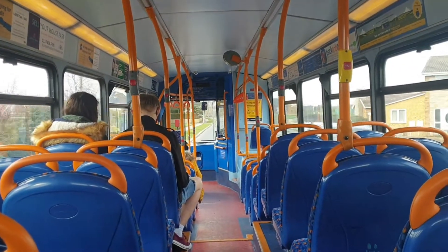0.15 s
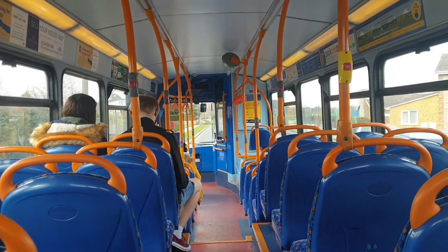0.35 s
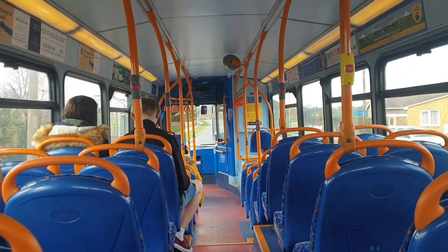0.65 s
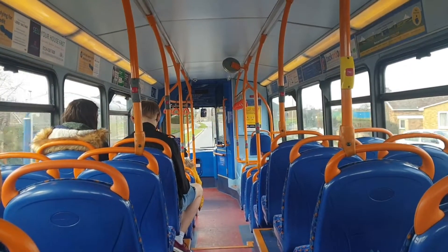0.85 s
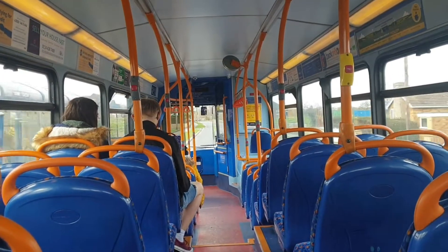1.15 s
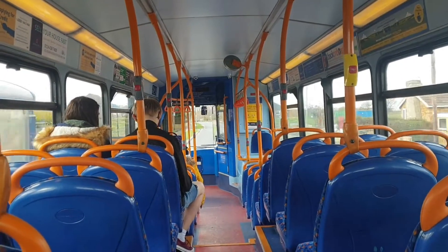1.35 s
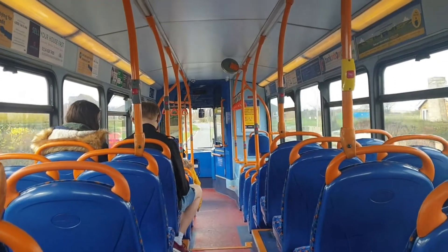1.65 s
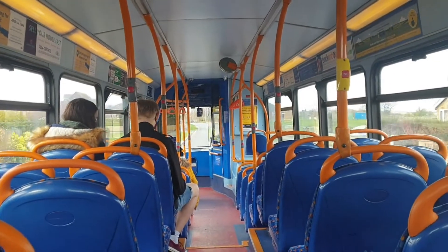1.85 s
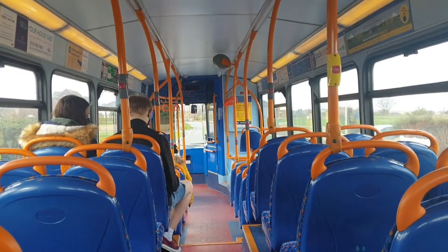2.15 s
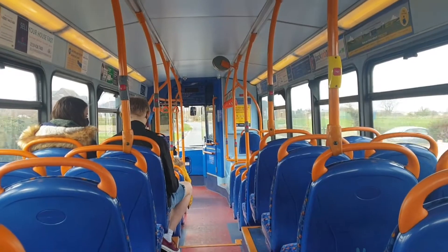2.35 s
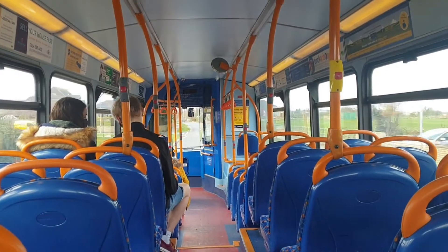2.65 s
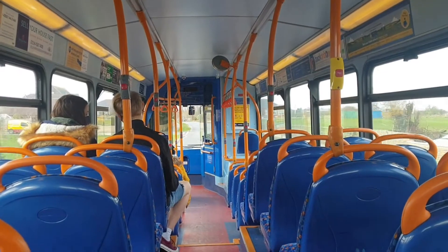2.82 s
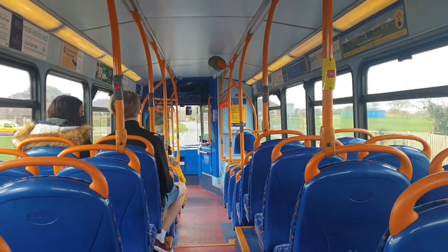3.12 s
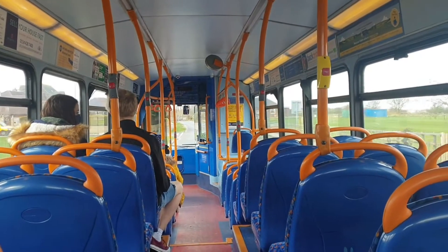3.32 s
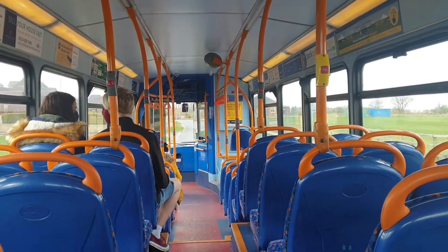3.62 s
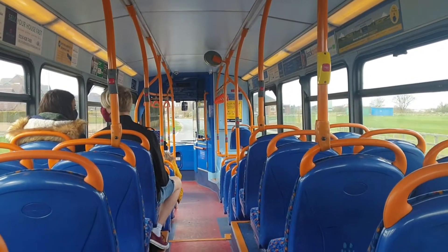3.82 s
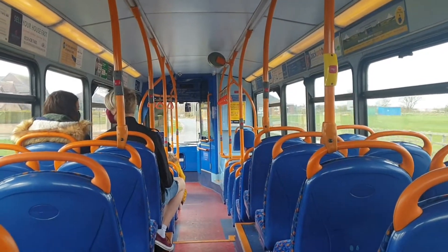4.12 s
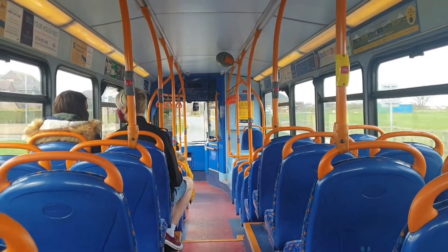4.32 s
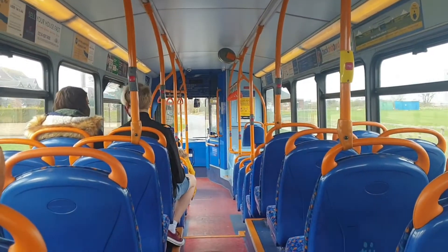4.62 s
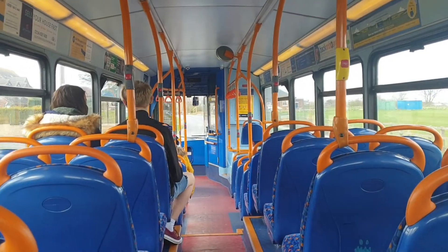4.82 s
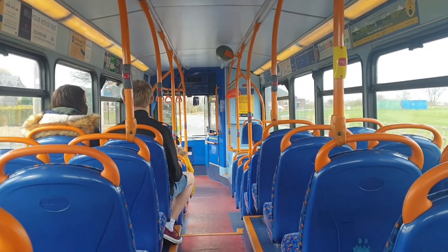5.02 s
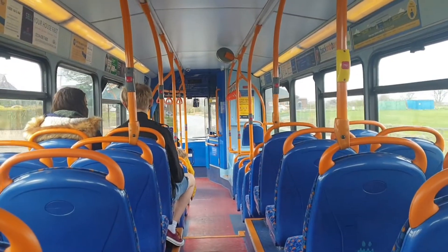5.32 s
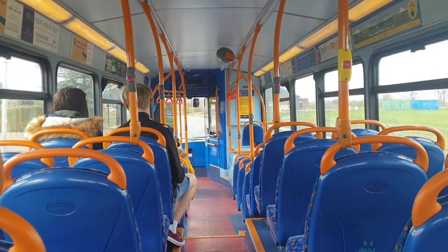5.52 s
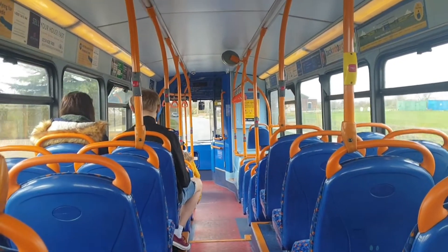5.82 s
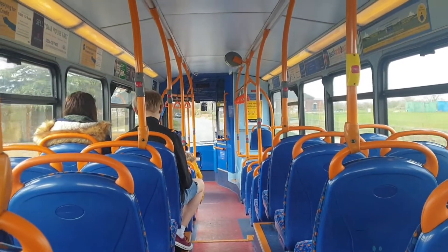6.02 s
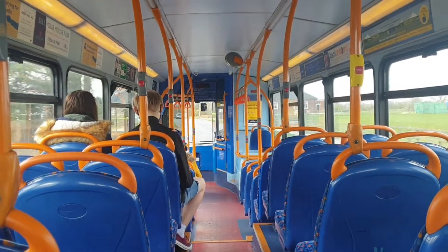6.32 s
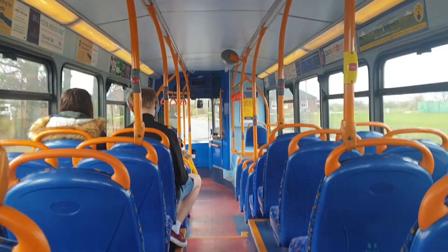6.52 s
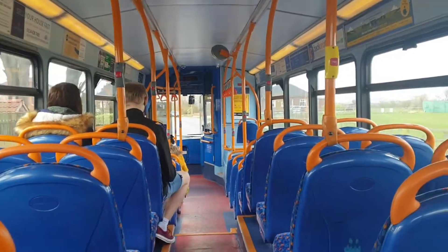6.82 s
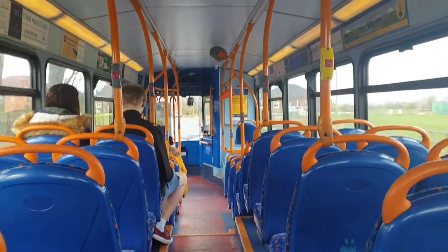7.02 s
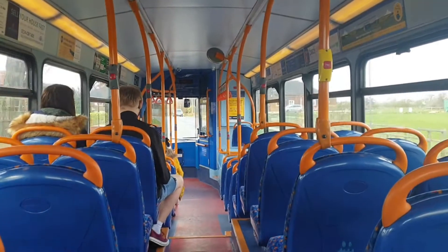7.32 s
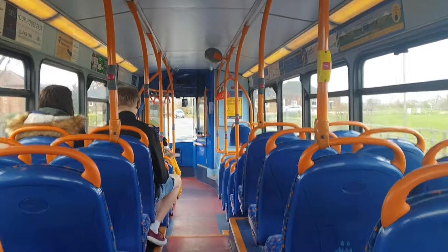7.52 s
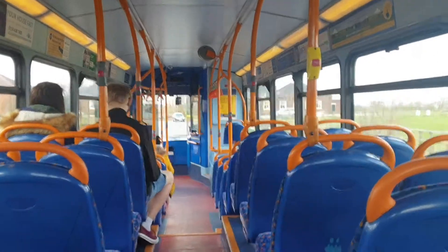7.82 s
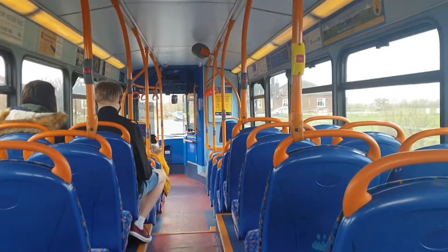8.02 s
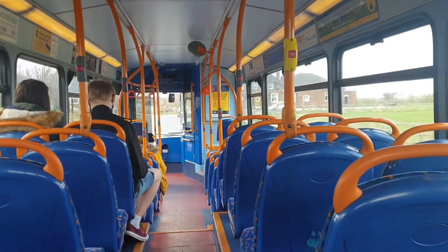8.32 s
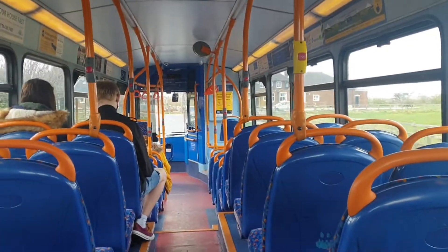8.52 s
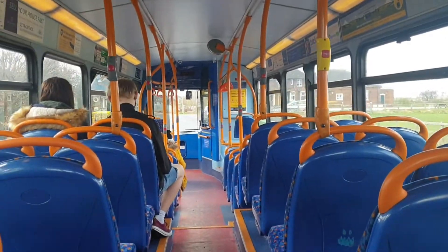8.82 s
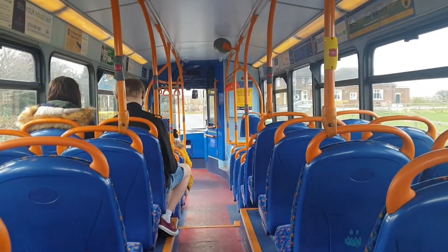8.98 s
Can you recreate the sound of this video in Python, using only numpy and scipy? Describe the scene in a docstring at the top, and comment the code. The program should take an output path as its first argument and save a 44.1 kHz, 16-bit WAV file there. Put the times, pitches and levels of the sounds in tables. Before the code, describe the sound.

Inside a moving diesel bus, the engine drones, drops a gear and pulls harder, changes up, then a loose panel rattles fast over rough road.

```python
"""Rear seats of a moving diesel bus. The six-cylinder engine changes down, pulls and changes up: its
firings are sines booming through saloon resonances, under shaft orders, knocks and bursts of noise.
The axle drone follows road speed, and turbo and fans whistle faintly. Shaped noise makes the road;
on a rough stretch the rumble rises and a loose panel slams about ten times a second, ringing, as
fittings buzz. A few hoots and metal tinkles are heard as well."""
import sys
import numpy as np
from scipy import signal
from scipy.fft import rfft, irfft, next_fast_len
from scipy.io import wavfile

SR = 44100
rng = np.random.default_rng(int(sys.argv[2]) if len(sys.argv) > 2 else 0)


def write(x):
    x = np.atleast_2d(x).T
    wavfile.write(sys.argv[1], SR, np.round(np.clip(x, -1, 1) * 32767).astype(np.int16))


N = 403498
TIME = np.arange(N) / SR
SIZE = next_fast_len(N + SR // 10, True)
FREQS = np.maximum(np.fft.rfftfreq(SIZE, 1 / SR), 1)

# engine speed: time_s, firing_hz
REVS = [(0, 51.82), (1.3, 53.5), (1.58, 73.54), (1.7, 77.74), (2.2, 78.06), (2.8, 81.67), (3.47, 81.6),
        (3.7, 71.75), (3.8, 65.96), (3.95, 59.22), (4.2, 57.97), (6.2, 58.86), (7, 60.1), (9.15, 59.1)]
# gear changes, down then up: start_s, end_s, axle_drone_change_db, engine_boom_change_db, floor_roar_change_db
SHIFTS = [(1.333, 1.688, -9.5, -6, 0.5), (3.648, 3.916, 2, -5.5, 6)]
# panel slams: time_s, level_db (among slams), then relative to it: thud_db, knock_db, sizzle_db, bounces_db
SLAMS = [(5.8592, -36.5, -0.5, -3, -6, 2), (6.46, -35, -17, -12, 8, 0), (6.541, -25, -8, -14, 0, 0),
         (6.597, -23.5, -2.5, -19, -8, -1), (6.6392, -22, 2, 1.5, -7, 3.5),
         (6.7332, -20.5, -3.5, 0, 2.5, -3.5), (6.8333, -20.5, -3, 0.5, 3, 2),
         (6.9195, -26.5, 3, 3, -2, 0.5), (7.0116, -19, -4.5, -4, 2, 4.5),
         (7.111, -20.5, -4.5, -1.5, -1, -5), (7.271, -29.5, -4.5, -12, -2, 0),
         (7.314, -29.5, -4.5, -1.5, 1, 2), (7.393, -32, -30, -20, 0, 8), (7.655, -22, -0.5, 2, 3.5, -2),
         (7.7627, -16.5, -1, -3, 0.5, 0.5), (7.8547, -15.5, -1.5, -3, 0, 3.5),
         (7.9579, -17.5, -4, 0, 2.5, 3.5), (8.0547, -18.5, -2.5, -2, 0.5, -0.5),
         (8.124, -33, -10, -11.5, 2, 0), (8.153, -24, -2, 1.5, 2, -4), (8.2175, -29, -15, -13, 0, 4),
         (8.69, -32.5, 1, 2, -6, 6), (8.781, -28.5, -0.5, 1, 2, 1)]
# panel knock spectrum: freq_hz, relative_db
KNOCK_COLOUR = [(600, -11), (1000, 1.5), (1700, -8), (2100, 8.5), (2500, -0.5), (2850, 2), (3500, -1),
                (4500, -18.5), (7000, -13), (9000, -27.5)]
# panel thud spectrum: freq_hz, relative_db
THUD_COLOUR = [(90, -24), (200, 1.5), (340, 8), (480, -5), (700, 0), (1000, -10.5), (1600, -18),
               (4000, -47.5)]

SHIFT_RAMP_S = .1
ROUGH_START_S, ROUGH_END_S, ROUGH_RAMP_S = 6.1, 8.3, 0.36
MAX_SIDE_LAG_S = 1.3e-4


def undb(db):
    """Decibels to gain."""
    return 10 ** (np.asarray(db) / 20)


def unit(x):
    """Scale to rms 1."""
    return x / np.sqrt(np.mean(x ** 2))


def curves(table):
    """Every column of a table, joined by straight lines in time."""
    time_s, *columns = np.transpose(table)
    return [np.interp(TIME, time_s, column) for column in columns]


def on_freqs(points):
    """Points joined on a log-frequency axis."""
    hz, value = np.transpose(points)
    return np.interp(np.log(FREQS), np.log(hz), value)


def response(hz, points):
    """Level in dB of a tone as it glides through a table of resonances."""
    return np.interp(hz, *np.transpose(points))


def during(start_s, end_s, ramp_s):
    """1 between two moments and 0 outside, with ramps centred on them."""
    return np.clip(.5 + np.minimum(TIME - start_s, end_s - TIME) / ramp_s, 0, 1)


def walk(rate_hz):
    """Smooth random wander with spread near 1, through rate_hz random knots a second."""
    knots = rng.standard_normal(1024)
    place = TIME * rate_hz % 1023
    k = place.astype(int)
    part = place - k
    ease = part * part * (3 - 2 * part)
    return knots[k] + (knots[k + 1] - knots[k]) * ease


def fade(t60_s):
    """Exponential decay that loses 60 dB in t60_s."""
    return np.exp(-np.minimum(np.log(1000) * TIME / t60_s, 50))


def filtered(x, gains):
    """Apply a frequency response."""
    return irfft(rfft(x, SIZE) * gains, SIZE)[..., :N]


def colour(x, points):
    """Causal minimum-phase filter with the given spectrum, built from its cepstrum."""
    cepstrum = irfft(np.log(undb(on_freqs(points))), SIZE)
    cepstrum[1:SIZE // 2] *= 2
    cepstrum[SIZE // 2 + 1:] = 0
    return filtered(x, np.exp(rfft(cepstrum)))


def voiced(x, points):
    """Colour a stereo signal and bring its middle to rms 1."""
    y = colour(x, points)
    return y / np.std(y.mean(axis=0))


def resonance(x, centre_hz, half_width_hz):
    """A sound heard through one two-pole resonance, at rms 1."""
    return unit(filtered(x, 1 / (1 + 1j * (FREQS - centre_hz) / half_width_hz) ** 2))


def turns(hz):
    """Cycles completed at a changing rate."""
    return np.cumsum(hz) / SR


def tone(cycles, db):
    """A sine with the given rms level."""
    return np.sqrt(2) * undb(db) * np.sin(2 * np.pi * cycles)


def spread(cycles, db):
    """A tone reaching the two sides with a random lag: the higher it is, the more their phases differ."""
    lag_samples = rng.uniform(-1, 1) * MAX_SIDE_LAG_S * SR
    return np.array([tone(cycles, db), tone(cycles + lag_samples * np.gradient(cycles), db)])


def diffuse():
    """Noise from all round the saloon: alike on both sides in the bass only."""
    # likeness of left and right: freq_hz, correlation
    likeness = [(60, .96), (130, .92), (290, .8), (640, .48), (1410, .02), (15000, .02)]
    like = np.clip(on_freqs(likeness), 0, 1)
    mid, side = rng.standard_normal((2, N))
    side = filtered(side, np.sqrt((1 - like) / (1 + like)))
    return np.array([mid + side, mid - side])


def scatter(blows, decay):
    """The saloon's dense reflections: fresh noise whose power follows the blows."""
    power = signal.fftconvolve(blows ** 2, decay[:SR // 2] ** 2)[:N]
    return diffuse() * np.sqrt(np.maximum(power, 0) / power.mean())


def lifted():
    """How far the driver's foot is off the pedal, 0-1."""
    # accelerator: time_s, share_of_full_throttle
    throttle = [(5.45, 0.93), (5.65, 0.3), (5.87, 0.46), (6.15, 0.98), (7.3, 0.79), (7.95, 0), (8.35, 0.33),
                (8.95, 0.28)]
    pedal, = curves(throttle)
    return 1 - np.clip(pedal, 0, 1)


def effort():
    """Engine effort in dB over cruising: it follows speed and throttle, late by the turbo's lag."""
    cruise_hz, db_per_octave, lift_db, turbo_lag_s = 58.5, 5.5, -6.5, 0.2
    hz, = curves(REVS)
    demand_db = db_per_octave * np.log2(hz / cruise_hz) + lift_db * lifted()
    keep = np.exp(-1 / (turbo_lag_s * SR))
    return signal.lfilter([1 - keep], [1, -keep], demand_db)


def gearbox():
    """Level changes in dB at the gear changes: axle drone, engine boom and floor roar."""
    return sum(np.outer(db, during(start_s, end_s, SHIFT_RAMP_S)) for start_s, end_s, *db in SHIFTS)


def engaged():
    """How firmly the top gear and the lower gear are engaged, 0-1; both let go during a change."""
    (down_start_s, down_end_s, *_), (up_start_s, up_end_s, *_) = SHIFTS
    top = 1 - during(down_start_s, up_end_s, SHIFT_RAMP_S)
    low = during(down_end_s, up_start_s, SHIFT_RAMP_S)
    return top, low


def road():
    """Bumps boom the body on its springs; driveline roars through the floor, tyres on the rough stretch."""
    # spectra: freq_hz, relative_db
    rumble_colour = [(15, -33.5), (26, 2.5), (42, 12), (52, 10), (68, 10), (85, 6), (105, -4.5), (200, -70)]
    # driveline roar: freq_hz, relative_db
    roar_colour = [(60, -12), (98, -1.5), (125, -1), (148, 7.5), (175, 4), (220, -1.5), (270, -3.5),
                   (350, -8.5), (450, -9), (600, -11.5), (760, -16), (1000, -21), (2000, -29.5),
                   (6000, -55)]
    # tyre roar: freq_hz, relative_db
    tyre_colour = [(60, -8.5), (98, -2), (148, 13.5), (220, 5), (270, 2), (350, -8.5), (450, -7.5),
                   (600, -9.5), (1000, -16), (2000, -21.5), (6000, -53)]
    # bumps: peak_s, body_boom_hz, peak_level_db
    bump_list = [(1.13, 43, -23), (4.47, 44, -32), (6.62, 42, -15.5), (6.84, 48, -16.5), (7.05, 42, -16),
                 (7.27, 49, -16), (7.63, 40, -17), (7.73, 52, -13.5), (7.99, 43, -18.5), (8.28, 138, -26.5),
                 (8.66, 47, -20)]
    rumble_db, rough_rumble_lift_db = -33, 6.5
    driveline_db, throttle_lift_db, tyres_db = -34, -2.5, -29
    bump_rise_s, bump_settle_s, bump_pitch_waver = 0.073, 0.092, .12

    rough = during(ROUGH_START_S, ROUGH_END_S, ROUGH_RAMP_S)
    rumble = voiced(diffuse(), rumble_colour) * undb(rumble_db + rough_rumble_lift_db * rough)
    bumps = 0
    for s, hz, db in bump_list:
        swell = np.exp(-np.maximum((s - TIME) / bump_rise_s, (TIME - s) / bump_settle_s))
        bumps = bumps + swell * tone(turns(hz * (1 + bump_pitch_waver * walk(25))), db)
    _, _, shift_db = gearbox()
    driveline_gain = undb(driveline_db + throttle_lift_db * lifted() + shift_db)
    driveline = voiced(diffuse(), roar_colour) * driveline_gain
    tyres = voiced(diffuse(), tyre_colour) * undb(tyres_db) * rough
    return rumble + bumps + (driveline + tyres) * undb(1.5 * walk(15))


def whistles():
    """The turbo tone spools up and runs down; the fans sing near a steady pitch over resonant air noise."""
    # turbo: time_s, pitch_hz, level_db
    turbo_track = [(1.5, 1244, -80), (2, 1380, -47.5), (2.45, 1525, -63), (2.8, 1740, -53),
                   (3.45, 1758, -58), (3.6, 1570, -62), (3.72, 1517, -51), (4, 1428, -49.5),
                   (4.3, 1385, -49), (4.6, 1320, -79)]
    # fan's clean tone: time_s, level_db
    fan_tone_track = [(0, -50), (.6, -59), (1.6, -52.5), (2.1, -51), (2.8, -55), (3.1, -46.5), (3.9, -48),
                      (4.05, -62), (4.5, -58), (4.8, -52), (5.8, -48), (6, -63), (8.3, -62), (8.55, -47),
                      (9.15, -48.5)]
    # fan air resonances: centre_hz, half_width_hz, final_level_db
    fan_bands = [(1295, 28, -50.5), (1246, 60, -48), (2783, 36, -61), (3460, 100, -61.5)]
    fan_tone_hz, swell_from_db, swell_end_s = 1303, -7.5, 5.9

    hz, db = curves(turbo_track)
    turbo = spread(turns(hz * (1 + .0008 * walk(30))), db + 1.5 * walk(15))
    tone_db, = curves(fan_tone_track)
    fan_tone = spread(turns(fan_tone_hz * (1 + .0055 * walk(30))), tone_db + 2.2 * walk(14))
    air = diffuse()
    bands = sum(resonance(air, centre, width) * undb(band_db) for centre, width, band_db in fan_bands)
    swell_db = swell_from_db * np.clip(1 - TIME / swell_end_s, 0, 1)
    return turbo + fan_tone + undb(swell_db) * bands


def hoots():
    """Soft short tones that swell and fade, perhaps trim rubbing."""
    # hoots: middle_s, length_s, pitch_hz, peak_level_db
    hoot_list = [(0.772, 0.14, 757, -44), (0.776, 0.11, 1010, -49), (1.121, 0.11, 760, -44),
                 (1.66, 0.19, 750, -52)]
    waver = 1 + .004 * walk(40)
    out = 0
    for middle_s, length_s, hz, db in hoot_list:
        swell = np.sqrt(np.maximum(1 - (2 * (TIME - middle_s) / length_s) ** 2, 0))
        out = out + spread(turns(hz * waver), db) * swell
    return out


def tinks():
    """Small metal parts tinkle: each contact is a decaying, beating cluster of four close partials."""
    # tinkles: start_s, pitch_hz, level_db (of each partial before averaging)
    tink_list = [(2.39, 6020, -47.5), (5.86, 3097, -42), (6.54, 3054, -34.5), (6.545, 5850, -39),
                 (6.59, 5610, -30), (6.593, 6500, -34)]
    out = np.zeros((2, N))
    ring_s = TIME[:SR // 5]
    decay = np.exp(-np.log(1000) * ring_s / 0.16)  # t60 in s
    detunes = rng.uniform(-.035, .035, (len(tink_list), 4))
    for (s, hz, db), detune in zip(tink_list, detunes):
        cluster = tone(np.outer(hz * (1 + detune), ring_s), db).mean(axis=0)
        at = int(s * SR)
        out[:, at:at + len(ring_s)] += cluster * decay
    return out


def fittings():
    """Window frames and seats buzz in dense small contacts, stirred by each slam and the rough road."""
    # buzz spectrum: freq_hz, relative_db
    buzz_colour = [(800, -34.5), (1700, 4), (2200, 0.5), (3200, -0.5), (4500, -6), (6500, -1.5),
                   (7400, -7.5), (8600, -27), (11000, -18.5), (16000, -41)]
    rough_db, slam_db, settle_s = -54, -16.5, 0.069  # slam_db is relative to the slam
    contacts_per_s, contact_t60_s, tail_t60_s = 220, .024, .45

    stir = undb(rough_db) * during(ROUGH_START_S, ROUGH_END_S, ROUGH_RAMP_S)
    for s, db, *_ in SLAMS:
        after = (TIME > s) * np.exp(-np.abs(TIME - s) / settle_s)
        stir = np.hypot(stir, undb(db + slam_db) * after)
    strengths = undb(4.0 * np.minimum(rng.exponential(size=N), 3))
    contacts = (rng.random(N) < contacts_per_s / SR) * strengths
    decay = fade(contact_t60_s) + undb(11.0) * fade(tail_t60_s)
    return voiced(scatter(contacts, decay), buzz_colour) * stir


def mode(blows, hz, t60_s):
    """One ringing mode; its pitch wanders as the loose panel seats differently from blow to blow."""
    detune = .04
    spin = np.exp(2j * np.pi * turns(hz * (1 + detune * walk(10))))
    keep = np.exp(-np.log(1000) / (t60_s * SR))
    ring = signal.lfilter([1], [1, -keep], blows * spin.conj() + 1e-18) * spin
    lag_s = rng.uniform(-1, 1) * MAX_SIDE_LAG_S
    return np.array([ring.imag, (ring * np.exp(2j * np.pi * hz * lag_s)).imag])


def panel_contacts():
    """Each slam is a soft touch, a hard blow, later chatter and a run of weakening bounces."""
    bounce_count, bounce_db, bounce_loss_db, bounce_gap_s = 4, -11.5, -2.5, .004
    ticks, slams, thuds, sizzles, strikes = np.zeros((5, N))
    chances = rng.random((len(SLAMS), 5 + bounce_count))
    for (s, db, thud_db, knock_db, sizzle_db, bounces_db), chance in zip(SLAMS, chances):
        # delay_s, hard_part_db, soft_part_db
        contacts = [
            (-.0035 - .002 * chance[0], -10, -1),
            (.0007, -1, -2),
            (.002 + .002 * chance[1], -8, -10),
            (.028 + .015 * chance[2], -19, -24),
            (.043 + .01 * chance[3], -19, -22),
            (.055 + .015 * chance[4], -21, -24),
        ]
        for k, slip in enumerate(chance[5:]):
            rebound_db = bounces_db + bounce_db + bounce_loss_db * k
            contacts.append(((k + 1 + slip) * bounce_gap_s, rebound_db, rebound_db))
        strikes[int(s * SR)] = undb(db + knock_db)
        for delay_s, hard_db, soft_db in contacts:
            at = int((s + delay_s) * SR)
            ticks[at] += undb(db + hard_db)
            sizzles[at] += undb(db + hard_db + sizzle_db)
            slams[at] += undb(db + hard_db + knock_db)
            thuds[at] += undb(db + soft_db + thud_db)
    return ticks, slams, thuds, sizzles, strikes


def panel():
    """A loose panel slams and chatters; main strikes ring its modes, and the saloon carries the tail."""
    # tick spectrum: freq_hz, relative_db
    tick_colour = [(1500, -28), (3200, 10.5), (4500, 6.5), (6000, 6.5), (7300, 7), (8600, -19.5),
                   (10500, -32), (16000, -33)]
    # sizzle spectrum: freq_hz, relative_db
    sizzle_colour = [(7000, -32), (8800, -8), (10500, 1.5), (16000, 1.5)]
    # panel modes: pitch_hz, t60_s, relative_db
    modes = [(336.4, 0.29, -3), (423.8, 0.29, -8), (581, 0.093, 4), (725, 0.049, -1.5), (1248, 0.1, -3),
             (2065, 0.16, -6), (2150, 0.16, -2), (2310, 0.19, -3), (2460, 0.15, -9), (2710, 0.14, -4),
             (2860, 0.26, -7), (3107, 0.063, -10), (3430, 0.088, -22)]
    tick_t60_s, knock_t60_s, thud_t60_s = .055, .07, .065
    treble_tail_t60_s, saloon_tail_t60_s, ring_scatter_db = .33, .7, 3.8

    ticks, slams, thuds, sizzles, strikes = panel_contacts()
    # bending waves carry the treble first: a quick falling chirp
    arrival_s = .0035 * np.sqrt(2000 / np.maximum(FREQS, 300)) - .0012
    snap = filtered(strikes, np.exp(-2j * np.pi * np.cumsum(arrival_s) * SR / SIZE))
    direct = voiced(np.array([snap, snap]), KNOCK_COLOUR) * undb(-47.5)
    body = voiced(np.array([snap, snap]), THUD_COLOUR) * undb(-44)

    grain = undb(2.4 * walk(130))
    treble_decay = fade(0.0047) + fade(tick_t60_s) + undb(-10.5) * fade(treble_tail_t60_s)
    knock_decay = fade(knock_t60_s) + undb(-6.5) * fade(saloon_tail_t60_s)
    thud_decay = fade(thud_t60_s) + undb(-8.5) * fade(saloon_tail_t60_s)
    tick = voiced(scatter(ticks, treble_decay) * grain, tick_colour) * undb(-49.0)
    sizzle = voiced(scatter(sizzles, treble_decay) * grain, sizzle_colour) * undb(-56.5)
    knock = voiced(scatter(slams, knock_decay) * grain, KNOCK_COLOUR) * undb(-44.5)
    thud = voiced(scatter(thuds, thud_decay), THUD_COLOUR) * undb(-36.0)

    # each blow favours other modes
    rings = sum(mode(strikes * undb(db + ring_scatter_db * walk(9.6)), hz, t60_s)
                for hz, t60_s, db in modes)
    return direct + body + tick + sizzle + knock + thud + undb(-42.5) * unit(rings)


def axle():
    """Final-drive teeth drone with road speed; level follows throttle, gear changes and floor resonances."""
    # road speed: time_s, drone_hz
    speed_track = [(0, 173.2), (.6, 176.3), (1.2, 179.8), (1.8, 181.1), (2.4, 182.8), (3, 188.9),
                   (3.6, 191.3), (4.2, 194.6), (4.8, 195.6), (6.2, 194.8), (7, 197.2), (7.6, 198.2),
                   (8.4, 196.2), (9.15, 192.6)]
    # floor resonances for the drone: freq_hz, gain_db
    drone_body = [(173, -3), (177, -1), (179.4, 0.7), (182.3, 0), (185, -4.5), (187, -10), (190.3, -11),
                  (192.8, -8.5), (195, -14), (199, -7.5)]
    # drone's second to fifth harmonics: freq_hz, level_db
    overtone_body = [(350, -49.5), (368, -39), (382, -45), (392, -49), (520, -55), (570, -57), (586, -53),
                     (700, -49.5), (732, -60.5), (757, -58), (767, -44.5), (782, -46), (790, -52),
                     (875, -51.5), (910, -53), (925, -56), (980, -61)]
    # brief dips of the drone: start_s, end_s, change_db
    dips = [(1.34, 1.405, -6.5), (1.593, 1.664, -6), (2.74, 2.841, -11.5), (2.976, 3.282, -13),
            (3.427, 3.618, -3.5), (5.559, 5.908, -9)]
    drone_db, throttle_lift_db = -15, -17.5
    whine_ratio, whine_db = 2.76, -50.5  # gearbox output whine, cycles per drone cycle

    hz, = curves(speed_track)
    shift_db, _, _ = gearbox()
    torque_db = throttle_lift_db * lifted() + shift_db
    cycles = turns(hz * (1 + 0.0015 * walk(10)))
    dips_db = sum(db * during(start_s, end_s, SHIFT_RAMP_S) for start_s, end_s, db in dips)
    # flutter grows away from the floor's main resonance
    body_db = response(hz, drone_body)
    flutter_db = (.6 + .09 * np.abs(body_db)) * walk(14)
    out = tone(cycles, drone_db + body_db + torque_db + dips_db + flutter_db)
    for k in range(2, 6):
        overtone_db = response(k * hz, overtone_body) + torque_db + 1.1 * walk(8.7)
        out = out + spread(k * cycles, overtone_db)
    return out + spread(whine_ratio * cycles, whine_db + torque_db + 2 * walk(7.2))


def engine_boom(hz, firings):
    """Firing rate, its octave and a belt-driven auxiliary boom through the saloon's resonances."""
    # saloon resonances: freq_hz, gain_db
    boom_body = [(47, -24), (52, -6.5), (53.2, -2), (58.5, 1), (62, 1), (65, 2.5), (73, -8.5), (78, -12),
                 (81.5, -5.5), (90, -12.5), (106, -16), (122, -14.5), (135, -4.5), (146, 10.5), (156, -4.5),
                 (165, -12)]
    throttle_lift_db = -14
    lift = lifted()
    _, shift_db, _ = gearbox()
    boom = 0
    for cycles_per_firing, db in [(1, -22), (2, -27), (.796, -25)]:
        body_db = response(cycles_per_firing * hz, boom_body)
        level_db = db + body_db + throttle_lift_db * lift + shift_db + 1.0 * walk(11.0)
        boom = boom + tone(cycles_per_firing * firings, level_db)
    return boom


def engine_orders(shaft):
    """Each gear brings out its own engine and gearbox orders, which waver and fade off the throttle."""
    # shaft orders: cycles_per_shaft_turn, top_gear_db, lower_gear_db
    order_list = [(1.5, -61.5, -45.5), (4.52, -59, -39.5), (5.5, -56.5, -44), (7.47, -39, -47),
                  (8.51, -43, -51), (11.12, -58, -44.5), (11.43, -50.5, -46.5), (13, -46, -55),
                  (14.54, -42, -49.5), (14.98, -52, -47.5), (22.96, -57, -50), (24.27, -56, -53.5),
                  (27.51, -48.5, -54.5), (28.44, -55, -66), (33.03, -52, -53), (35, -61, -56)]
    throttle_lift_db = -5.5
    top, low = engaged()
    orders = 0
    for k, top_db, low_db in order_list:
        gear_gain = top * undb(top_db) + low * undb(low_db)
        orders = orders + spread(k * shaft + .05 * walk(12), 2 * walk(6)) * gear_gain
    return orders * undb(throttle_lift_db * lifted())


def engine_block(shaft, effort_db):
    """Knocks of six cylinders: a random-phase cycle replayed every two shaft turns."""
    # block spectrum: freq_hz, relative_db
    block_colour = [(90, -10.5), (120, -1), (165, 9), (215, 4.5), (290, 3), (380, -3), (510, -10.5),
                    (620, -10.5), (720, -15), (880, -13), (1100, -25.5), (1800, -29)]
    block_db = -34.5  # at cruising effort
    size, count = 4096, 200
    # whole shaft orders outweigh the half orders
    strength = undb(-1.5 * (np.arange(count) % 2))
    knocks = irfft(strength * np.exp(2j * np.pi * rng.random((2, count))), size)
    place = shaft / 2 % 1 * size
    mid, side = (np.interp(place, np.arange(size), knock) * undb(1.0 * walk(7.1)) for knock in knocks)
    return voiced(np.array([mid + .5 * side, mid - .5 * side]), block_colour) * undb(block_db + effort_db)


def combustion(firings, effort_db):
    """Noise bursts at each firing: clatter, the cover resonances it rings, and air hiss."""
    # clatter spectrum: freq_hz, relative_db
    clatter_colour = [(450, -13.5), (700, 0), (880, -3), (1040, -10.5), (1300, -5.5), (1550, -7.5),
                      (1800, -6.5), (2240, -11.5), (2480, -8), (2900, -14), (3500, -11.5), (4500, -20),
                      (7000, -22), (8000, -29), (9500, -59)]
    # engine cover resonances: centre_hz, half_width_hz, level_db (at cruising effort)
    cover_bands = [(874, 60, -58.5), (1114, 41, -53.5), (1401, 45, -55.5), (1754, 79, -54),
                   (1922, 30, -55.5), (2153, 45, -57.5)]
    # hiss spectrum: freq_hz, relative_db
    hiss_colour = [(5000, -10), (8000, -10.5), (9200, -4.5), (11000, -0.5), (13000, 2), (16000, -3.5)]
    clatter_db, hiss_db = -43.5, -65.5  # at cruising effort
    cover_growth, hiss_growth = 0.57, 1.7  # dB per dB of effort

    bursts = 2.0 + np.exp(-(firings % 1) / 0.35)
    clatter = voiced(diffuse() * bursts * undb(0.77 * walk(25)), clatter_colour)
    clatter = clatter * undb(clatter_db + effort_db)
    knocking = diffuse() * bursts
    cover = sum(resonance(knocking, centre, width) * undb(db) for centre, width, db in cover_bands)
    cover = cover * undb(cover_growth * effort_db)
    hiss = voiced(diffuse() * bursts, hiss_colour) * undb(hiss_db + hiss_growth * effort_db)
    return clatter + cover + hiss


def engine():
    """Six-cylinder diesel, three firings a shaft turn: boom, shaft orders, block knocks and combustion noise."""
    hz, = curves(REVS)
    effort_db = effort()
    firings = turns(hz * (1 + 0.0015 * walk(12)))
    shaft = firings / 3
    tones = engine_boom(hz, firings) + engine_orders(shaft)
    return tones + engine_block(shaft, effort_db) + combustion(firings, effort_db)


def scene():
    """Everything heard from the rear seats."""
    surroundings = road() + whistles() + hoots() + tinks()
    return surroundings + fittings() + panel() + axle() + engine()


def record(dry):
    """The left microphone port is muffled in the treble; the top is cut steeply."""
    # microphone pair: freq_hz, left_minus_right_db
    port_balance = [(60, 1.5), (110, 7.5), (200, 0), (700, 0.5), (1290, -5.5), (2380, -7), (4400, -14),
                    (6000, -21.5), (8120, -35.5), (11000, -20.5), (15000, -16)]
    top_hz = 15850
    ratio = undb(on_freqs(port_balance))
    ports = np.array([ratio, np.ones_like(ratio)]) * np.sqrt(2 / (1 + ratio ** 2))
    heard = filtered(dry, ports)
    return signal.sosfilt(signal.ellip(10, .2, 80, top_hz, fs=SR, output="sos"), heard)


dry = scene()
out = record(dry)
write(out)
```